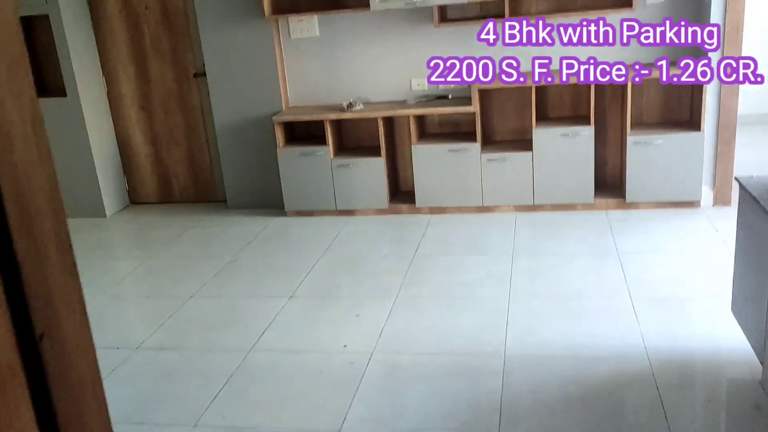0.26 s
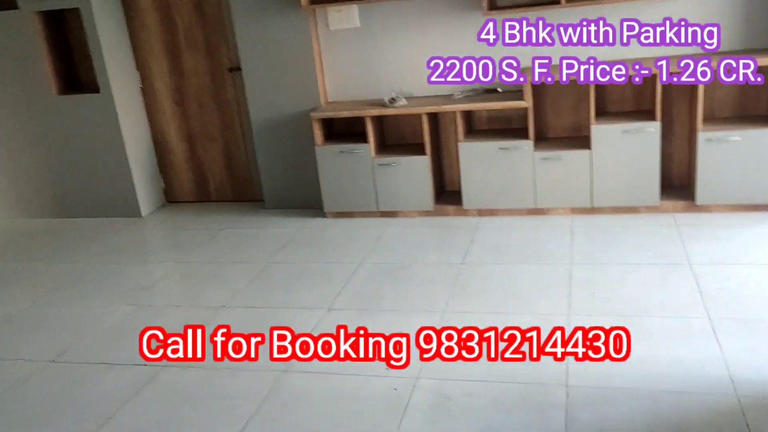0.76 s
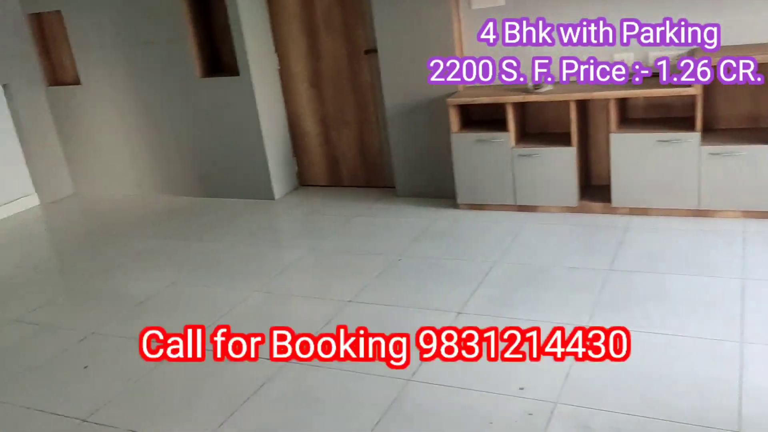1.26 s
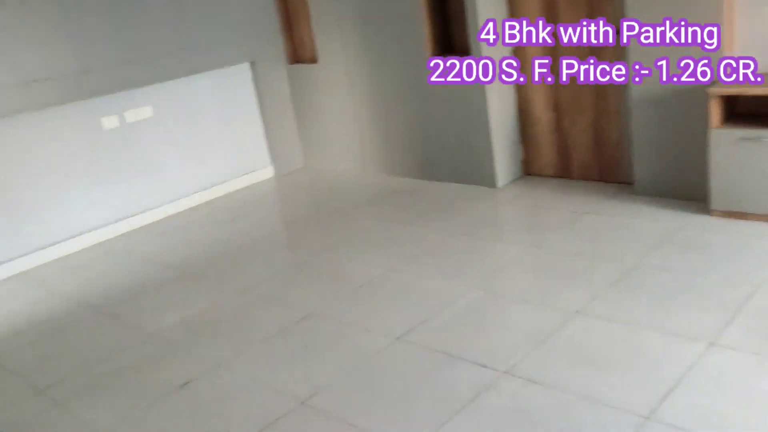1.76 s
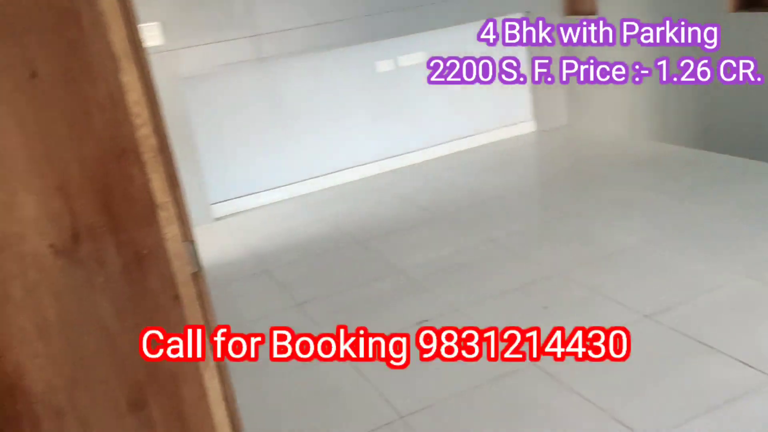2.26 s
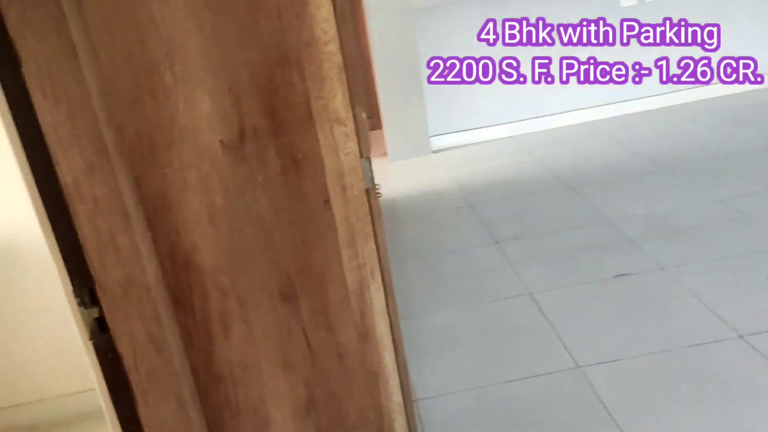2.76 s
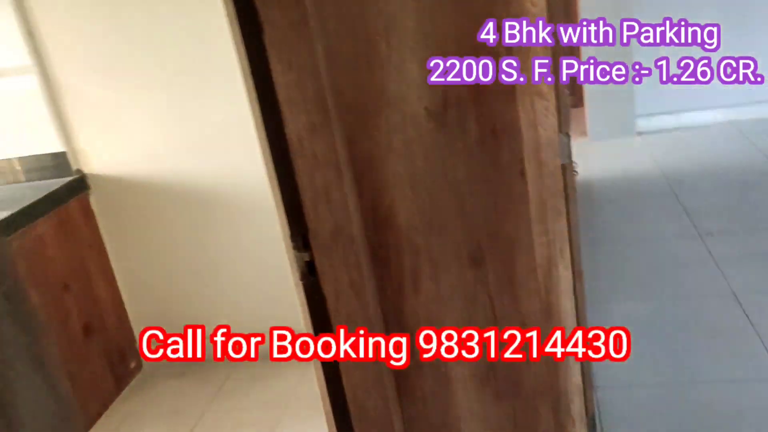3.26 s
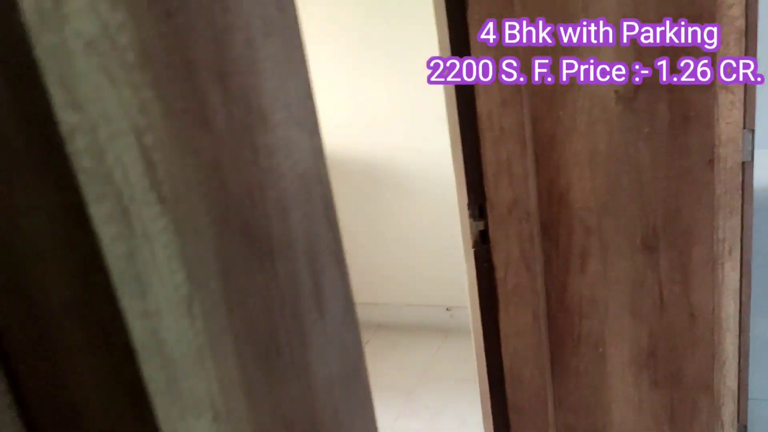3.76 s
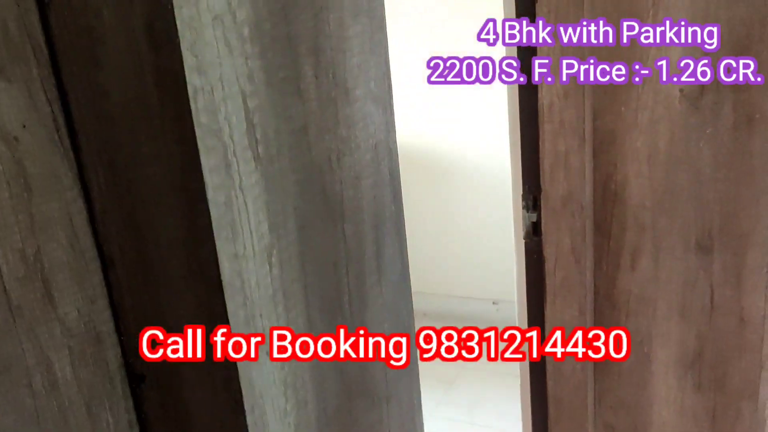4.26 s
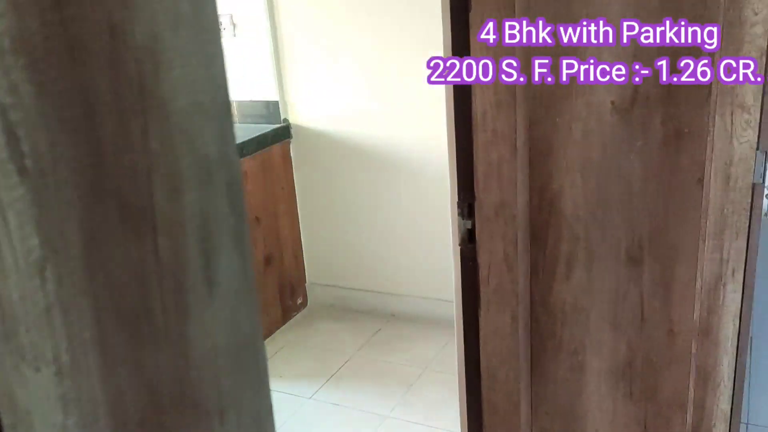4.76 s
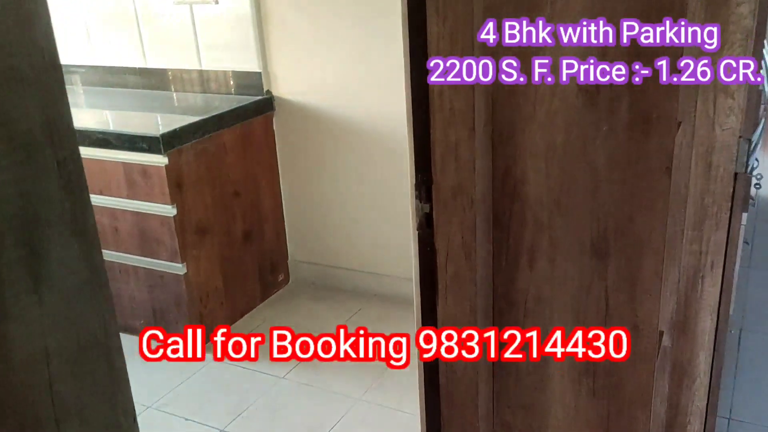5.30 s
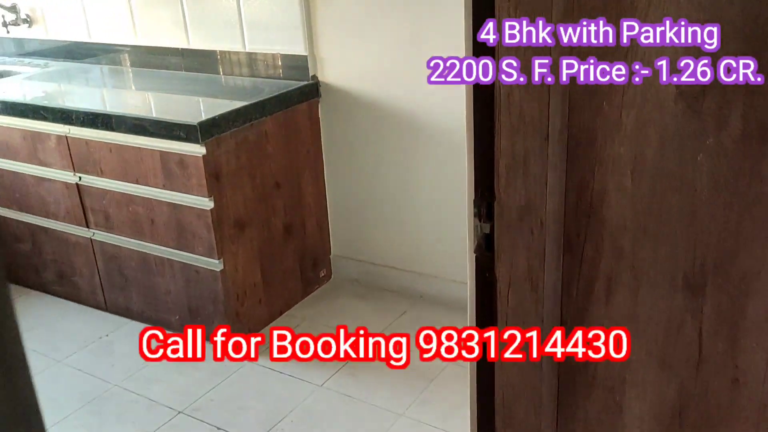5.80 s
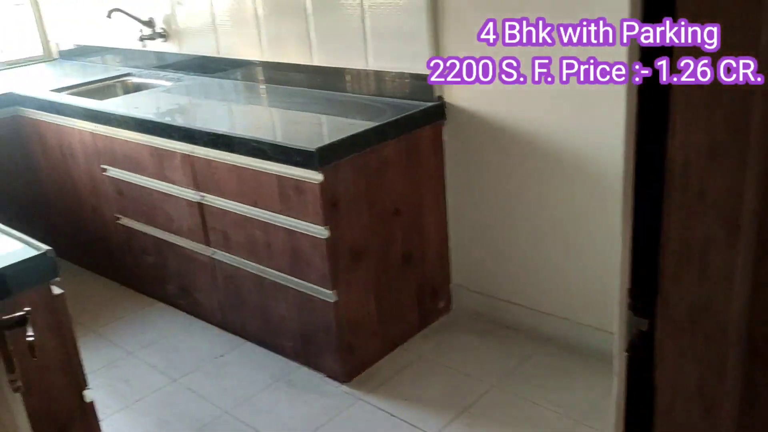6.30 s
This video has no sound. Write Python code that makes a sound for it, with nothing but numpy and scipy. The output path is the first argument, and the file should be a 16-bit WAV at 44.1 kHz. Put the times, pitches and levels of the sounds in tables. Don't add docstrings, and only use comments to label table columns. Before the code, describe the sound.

Distant traffic, low engine drones and faint horns sit under soft steps and dragging shoes on dusty tiles. After several quiet seconds a door gives a dull double thump, swings back briefly, and slams extremely loudly with a metallic snap, rattling wood and a push of low air. Bare walls ring for over a second, the leaf humming low. Stereo phone, close and distorted at the peak.

```python
import sys
import numpy as np
from scipy import signal
from scipy.fft import rfft, irfft, next_fast_len
from scipy.io import wavfile
from scipy.ndimage import uniform_filter1d

SR = 44100
rng = np.random.default_rng(int(sys.argv[2]) if len(sys.argv) > 2 else 0)


def boost(x):
    u = np.asarray(x, float) / 20
    return 10 ** u


def int16_out(signal):
    q = np.round(np.clip(np.atleast_2d(signal).T, -1, 1) * 32767)
    wavfile.write(sys.argv[1], SR, q.astype(np.int16))


N = 288502


def evened(x):
    return x / np.sqrt(np.mean(x ** 2) + 1e-20)


def read(points, hz):
    f, value = np.transpose(points)
    return np.interp(np.log(hz + 1), np.log(f + 1), value)


def follow(points, outside_db):
    s, db = np.transpose(points)
    return np.interp(np.arange(N) / SR, s, db, outside_db, outside_db)


def add(mix, s, sound):
    part = mix[..., round(s * SR):][..., :sound.shape[-1]]
    part += sound[..., :part.shape[-1]]


def colour(x, points, share=1):
    size = next_fast_len(x.shape[-1])
    gain = boost(share * read(points, np.fft.rfftfreq(size, 1 / SR)))
    return irfft(rfft(x, size) * gain, size)[..., :x.shape[-1]]


def sides(x, balance):
    return np.array([colour(x[0], balance, 0.63), colour(x[-1], balance, 0.21)])


def noise(same, field_db, length=N, size=512):
    frames, hz = 4 * length // size + 5, np.fft.rfftfreq(size, 1 / SR)
    a, b, c, d = rng.standard_normal((frames, len(hz), 4)).T
    alike = np.clip(read(same, hz), -1, 1)[:, None]
    left = a + 1j * b
    right = alike * left + np.sqrt(1 - alike ** 2) * (c + 1j * d)
    z = np.array([left, right]) * boost(field_db(hz[:, None], np.arange(frames) * size / 4 / SR))
    return signal.istft(z, nperseg=size, noverlap=3 * size // 4)[1][:, :length]


def lumps(per_s):
    width = int(SR / per_s)
    once = uniform_filter1d(rng.standard_normal(N), width, mode="wrap")
    return evened(uniform_filter1d(once, width, mode="wrap"))


def swell(start, rise, hold, db, fade_db_per_s):
    t = np.arange(N) / SR - start
    return np.clip(t / rise, 0, 1) * boost(db - fade_db_per_s * np.maximum(t - rise - hold, 0))


def ring(modes, spread_db, rise_s, size=SR):
    t = np.arange(size) / SR
    out = np.zeros(size)
    for (hz, db, t60), share_db in zip(modes, spread_db * rng.standard_normal(len(modes))):
        out += boost(db + share_db - 60 * t / t60) * np.sin(2 * np.pi * hz * t)
    return out * (1 - np.exp(-t / rise_s)) / 2


# f/Hz, likeness [-1 to 1]
ROOM_SAME = [(60, .96), (180, .95), (400, .85), (800, .55), (1600, -.3), (5000, .05), (15000, .1)]


def burst(t60, spectrum, rise_s):
    t = np.arange(4096) / SR
    fade = boost(-60 * t / t60) * (1 - np.exp(-t / rise_s))
    z = rfft(noise(ROOM_SAME, lambda hz, frame: 0 * (hz + frame), length=len(t), size=256) * fade)
    z *= boost(read(spectrum, np.fft.rfftfreq(len(t), 1 / SR))) / (np.abs(z) + 1e-12) ** 0.75
    x = irfft(z) * np.sqrt(fade)
    return x / np.abs(x).max()


# f/Hz, t60/s
ROOM_T60 = [(40, 0.17), (120, 1.03), (300, 1.315), (900, 1.56), (2000, 1.42), (4000, 1.08), (8000, 0.81),
            (14000, 0.48)]
# f/Hz, level/dB
ROOM_COLOUR = [(40, -4), (90, -6.5), (150, -8), (350, -3.5), (900, -5), (2000, -6), (3700, -9.5),
               (6000, -13), (14000, -8)]


def room(x):
    def fading_db(hz, t):
        near_walls_db = 2 * np.exp(-t / 0.21)
        return near_walls_db - 60 * t / read(ROOM_T60, hz)
    tail = noise(ROOM_SAME, fading_db, length=2 * SR, size=1024)
    tail *= np.clip(np.arange(2 * SR) / SR / 0.0017 - .3, 0, 1)
    tail /= np.linalg.norm(tail[0])
    return colour(signal.fftconvolve(x, tail, axes=1)[:, :N], ROOM_COLOUR)


# f/Hz, level/dB per Hz
TRAFFIC = [(12, -36.5), (20, 8), (49, -4), (70, -4.5), (107, -6.5), (140, -8.5), (313, -13), (348, -16),
           (410, -18.5), (700, -26), (910, -27.5), (1540, -120)]
# f/Hz, level/dB per Hz
AIR = [(180, -48.5), (300, -23.5), (404, -30.5), (526, -16.5), (768, -35.5), (937, -15.5), (1350, -18.5),
       (1590, -18), (2650, -22), (3510, -29), (11000, -23.5), (15500, -34.5)]
# f/Hz, likeness [-1 to 1]
AIR_SAME = [(60, 0.83), (180, 1), (550, 0.69), (1650, -0.034), (4970, 0.24), (15000, 0.033)]
# f/Hz, level/dB
AIR_SIDE = [(60, 4), (240, -1), (950, 7.5), (3770, 20.5), (15000, -2.5)]
# t/s, hold/s, level/dB
PASSING = [
    (0.0, .18, -57),
    (2.2, .08, -62),
]
# t/s, level/dB
HISS = [(0.0, -79.5), (1.2, -80), (2.0, -83.5), (2.6, -81.5), (3.6, -83), (4.49, -85)]
# t/s, hold/s, level/dB, fade/dB per s
SHUDDER = [
    (4.48, 0.034, -38, 85),
    (4.734, 0.084, -51, 287),
    (4.972, 0.015, -23.5, 48),
    (5.277, 0.41, -39.5, 99),
    (5.96, 0.39, -50.5, 106.5),
]


def street():
    rumble = evened(noise(AIR_SAME, lambda hz, t: read(TRAFFIC, hz) - 40 * (hz < 18) + 0 * t, size=4096))
    load = boost(-52.5 + 0.6 * lumps(0.99))
    load += sum(swell(s, 0.088, hold, db, 25) for s, hold, db in PASSING)
    load *= boost(1.3 * lumps(9))

    hiss = evened(noise(AIR_SAME, lambda hz, t: read(AIR, hz) + 0 * t))
    ducked_db = follow([(5.0, 0), (5.72, 0), (6.22, 5)], outside_db=5)
    hiss_db = follow(HISS, outside_db=-73.5) + 8.1 + uniform_filter1d(ducked_db, 1000)

    def low_hump_db(hz, t):
        return -24 * np.abs(np.log2((hz + 1) / 35)) + 0 * t
    shake = evened(noise(ROOM_SAME, low_hump_db, size=4096))
    shaking = sum(swell(s, 0.16, hold, db, fade) for s, hold, db, fade in SHUDDER)
    return sides(load * rumble + boost(hiss_db) * hiss, AIR_SIDE) + shaking * shake


def waver(hz, wobble_hz, flutter_db):
    turns = np.cumsum(hz + wobble_hz * lumps(22.7)) / SR
    return np.sqrt(2) * boost(flutter_db * lumps(23)) * np.sin(2 * np.pi * turns)


# t/s, hold/s, first f/Hz, last f/Hz, level/dB
DRONE = [
    (0.03, .15, 112, 110, -57),
    (2.4, .55, 117, 118, -58),
    (3.11, .3, 101, 103, -50),
    (3.55, .26, 103, 104, -54),
    (4.0, .16, 104.5, 106, -50),
    (2.42, 2.0, 211, 238, -62),
]


def drone():
    t = np.arange(N) / SR
    out = np.zeros(N)
    for s, hold, first_hz, last_hz, db in DRONE:
        hz = np.interp(t, [s, s + hold], [first_hz, last_hz])
        gain = swell(s, 0.048, hold, db, fade_db_per_s=85.5)
        out += gain * waver(hz, 0.0147 * first_hz, 1.2)
    return out


# f/Hz, level/dB
FIRST_HORN = [(2288, -74), (2708, -51.5), (3155, -50), (3607, -52)]
SECOND_HORN = [(2729, -75.5), (2885, -83.5)]
THIRD_HORN = [(1640, -69), (2130, -69.5)]
SQUEAL = [(3413, -78)]
# t/s, hold/s, level/dB, fade/dB per s
HONKS = [
    (0.0, .9, -72, 22),
    (3.7, .7, -78, 40),
    (.2, .3, -71, 40),
    (2.88, .7, -90, 30),
]
# t/s, hold/s, level/dB
FIRST_GLINTS = [
    [],
    [(.05, .05, -74), (.18, .04, -62), (.27, 0.042, -69), (.5, 0.092, -62), (.62, .05, -67),
     (.78, .11, -62), (1.02, 0.094, -64.5), (1.17, .05, -63), (1.28, .03, -78)],
    [(0.0, .09, -71), (.17, .02, -72), (.37, .05, -72), (.47, .03, -78), (.54, .04, -69), (.67, 0.046, -67),
     (.72, 0.049, -56.5), (.9, .06, -68), (1.145, .01, -63)],
    [(.04, .18, -76), (.44, 0.15, -74.5), (.79, .06, -71)],
]
SECOND_GLINTS = [
    [(3.46, .03, -74), (3.56, 0.072, -73), (3.74, 0.13, -64), (3.95, 0.15, -61.5), (4.16, 0.039, -69),
     (4.32, 0.11, -74)],
    [(3.84, .02, -65), (3.91, .02, -71), (3.98, .14, -71), (4.2, .12, -74)],
]
SQUEAL_GLINTS = [
    [(2.88, .04, -69), (3.0, 0.065, -68), (3.17, 0.021, -70), (3.285, .01, -82), (3.375, .02, -75),
     (3.47, .05, -83), (3.62, .06, -80)],
]


def horns():
    out = np.zeros((2, N))
    ear_gain = boost(np.array([[2.5], [-4.5]]))
    sources = zip([FIRST_HORN, SECOND_HORN, THIRD_HORN, SQUEAL], HONKS,
                  [FIRST_GLINTS, SECOND_GLINTS, [[], []], SQUEAL_GLINTS])
    for partials, (s, hold, honk_db, fade), glints in sources:
        loudest_db = max(db for hz, db in partials)
        for (hz, db), flashes in zip(partials, glints):
            ears = ear_gain * np.array([waver(hz, 5, 2.1), waver(hz, 5, 2.8)])
            gain = swell(s, 0.028, hold, honk_db + db - loudest_db, fade)
            for start, length, glint_db in flashes:
                gain += swell(start, 0.024, length, glint_db, fade_db_per_s=350)
            out += gain * ears
    return out


# t/s, rise/s, hold/s, level/dB, rubber chafe level/dB
SCUFFS = [
    (0.772, 0.007, 0.014, -53.5, -23),
    (0.897, .011, 0.084, -68, -1),
    (1.03, .011, 0.043, -58, -27),
    (1.379, 0.04, 0.026, -60.5, -5.5),
    (2.282, 0.019, 0.14, -62.5, -8),
    (2.448, 0.085, 0.43, -58.5, -16),
    (3.322, 0.022, 0.046, -64.5, -12),
    (3.805, 0.071, 0.052, -62, -3.5),
    (5.246, 0.1, 0.053, -62.5, -10),
    (5.745, .015, 0.023, -82.5, -13.5),
]
# f/Hz, level/dB per Hz
SCUFF = [(500, -26.5), (900, -2.5), (2210, -7.5), (4100, -3), (5100, -1), (6300, -3.5), (10000, -4),
         (13500, -8), (15500, -11)]
# f/Hz, level/dB
CHAFE = [(1300, -42), (1800, -2), (2300, 7.5), (2800, -8.5), (3300, -23)]


def scuffs():
    grit = evened(noise(AIR_SAME, lambda hz, t: read(SCUFF, hz) + 0 * t, size=256))
    chafe = evened(colour(grit, CHAFE))
    drag = np.zeros((2, N))
    for s, rise, hold, db, chafe_db in SCUFFS:
        drag += swell(s, rise, hold, db, fade_db_per_s=146) * (grit + boost(chafe_db) * chafe)
    return 1.44 * drag * boost(1.2 * lumps(150))


# t/s, sole level/dB, centre f/Hz, breadth/octaves, click level/dB
STEPS = [(.106, -54.5, 870, 1.8, -71), (0.186, -37.5, 1700, 0.84, -48), (.19, -43, 378, .3, -75),
         (0.1987, -39.5, 343, 0.37, -75), (.207, -36, 343, 0.2, -75), (.208, -45, 880, 0.19, -75),
         (.215, -42, 875, 0.17, -75), (.232, -44, 535, 0.65, -71), (0.445, -54, 6100, 0.4, -64),
         (.496, -47.5, 2300, 0.76, -63), (0.8723, -34, 2100, 0.81, -80), (.8818, -38, 4840, 0.59, -71),
         (0.8825, -29, 735, 0.42, -37), (.884, -39, 1900, 0.36, -61), (.8865, -37, 987, 0.053, -77),
         (.901, -40, 364, 0.25, -71), (1.029, -65, 780, 0.4, -26.5), (1.4995, -42, 860, 0.69, -66),
         (1.501, -39, 193, .5, -79), (1.516, -46.5, 260, 0.51, -79), (1.54, -47, 323, .5, -81),
         (1.562, -46, 278, 0.58, -79), (2.085, -42.5, 2700, 0.63, -72), (2.2864, -36, 560, 1.2, -65),
         (2.292, -38.5, 2500, 0.57, -66), (2.315, -42.5, 610, 0.4, -79), (2.345, -45.5, 453, 0.81, -79),
         (2.496, -34.5, 236, 0.55, -69), (2.837, -45.5, 1170, 0.76, -73), (3.2, -53, 2380, 0.32, -65),
         (3.326, -43, 320, 0.59, -68), (4.101, -50, 2400, 0.46, -60), (4.231, -74, 5900, 0.65, -54)]
NUDGES = [
    (4.806, -34.5, 696, 0.63, -73.5),
    (4.816, -24, 384, 1, -70),
    (4.826, -27, 600, 0.82, -68),
    (4.838, -41.5, 478, 0.76, -69.5),
]
# f/Hz, level/dB per Hz
GRIT = [(900, -33), (2000, -4), (3500, -2.5), (5500, 3), (8000, 3), (11000, 5.5), (13500, -13),
        (16000, -28)]
# centre f/Hz, left minus right level/dB
STEP_SIDE = [(300, -1), (800, 0.5), (2000, 9), (6000, 2)]


def steps(falls):
    out = np.zeros((2, N))
    for s, db, hz, octaves, click_db in falls:
        sole = [(hz * 2 ** (-3 * octaves), -50), (hz * 2 ** -octaves, -8), (hz, 0),
                (hz * 2 ** octaves, -9), (hz * 2 ** (3 * octaves), -40)]
        fall = boost(db) * burst(0.11, sole, rise_s=0.00025)
        fall = fall + boost(click_db) * burst(0.038, GRIT, rise_s=0.00029)
        t = np.arange(fall.shape[-1]) / SR
        fall = fall * (1 + 0.75 * boost(-60 * t / 0.0031))
        lean = boost(read(STEP_SIDE, hz) * np.array([[1], [-1]]) / 2)
        add(out, s, lean * fall)
    return out


# t/s, level/dB, f/Hz, t60/s
GUSTS = [
    (4.909, 2.5, 28.5, .15),
    (4.957, -6, 38, .08),
    (4.976, -9, 78, .2),
    (4.997, -6, 42, .2),
    (5.002, -6, 80, .17),
]


def gusts():
    out = np.zeros(N)
    for s, db, hz, t60 in GUSTS:
        add(out, s, -2 * ring([(hz, db, t60)], spread_db=0, rise_s=0.003))
    return out


# f/Hz, level/dB, t60/s
HELD = [(95.1, -7.5, 0.92), (103.6, -17, 1.3), (203, -18, 0.72), (231.6, -13, 0.66), (282, -21.5, 0.49),
        (299, -29, 0.77)]


def held():
    out = np.zeros(N)
    add(out, 4.985, -ring(HELD, spread_db=2, rise_s=0.0097))
    return out


def jamb():
    out, t = np.zeros(N), np.arange(SR // 2) / SR
    hum = np.sin(2 * np.pi * 392 * t)
    for s, crack_db, knock_db, boom_db, pump_db in BLOWS:
        add(out, s, boost(2.8 * knock_db - 0.5 - 60 * t / 0.5) * hum)
    return out


# t/s, level/dB, centre f/Hz
LATCH = [
    (4.9112, 1, 6040),
    (4.914, -15.5, 6816),
    (4.939, -18, 6800),
    (4.975, -9, 4500),
    (4.984, -17, 10300),
]


def latch():
    out = np.zeros((2, N))
    octaves = 0.12
    for s, db, hz in LATCH:
        snap = [(hz * 2 ** (-4 * octaves), -40), (hz * 2 ** -octaves, -9), (hz, 0),
                (hz * 2 ** (2 * octaves), -9), (16000, -35)]
        add(out, s, boost(db) * burst(0.0047, snap, rise_s=0.00054))
    return out


# t/s, latch crack, panel knock, leaf boom, air pump level/dB
BUMPS = [
    (4.494, -22, -28.5, -38.5, -29.5),
    (4.497, -31, -22, -39.5, -39),
    (4.5005, -31.5, -29.5, -43, -35),
    (4.509, -41.5, -19, -16.5, -24.5),
    (4.516, -26.5, -25.5, -25, -47),
    (4.5215, -50, -20, -18.5, -30.5),
    (4.534, -35.5, -45, -20, -46.5),
    (4.812, -61, -57, -32, -35.5),
]
BLOWS = [
    (4.910, -5, -4.5, -5, -9),
    (4.920, -20, -7.5, -20, -20.5),
    (4.940, -18.5, -18.5, -16, -28),
    (4.9622, -30, -15, -0.5, -21),
    (4.979, -21.5, -6, -28.5, -34),
    (4.987, -18.5, -9.5, -1, -42.5),
    (4.993, -28.5, -12.5, -29, -45),
    (5.071, -42, -15.5, -30, -43.5),
    (5.131, -55, -26.5, -26.5, -44),
]
# f/Hz, level/dB, t60/s
BUMP_PANEL = [(176, 2.5, 0.13), (204.6, -5, 0.069), (244.9, 5, 0.25), (320, -9.5, 0.034), (514, 5, 0.093),
              (675, -10, 0.036), (880, -12.5, 0.04), (1120, -10.5, 0.037), (1675, 0.5, 0.036),
              (2100, -4, 0.03)]
# f/Hz, level/dB, t60/s
PANEL = [(165, -10.5, 0.025), (225, 5, 0.14), (305.4, -6, 0.18), (468, -12.5, 0.34), (562, -1.5, 0.053),
         (708, -3, 0.086), (869, -11, 0.14), (977, -7, 0.2), (1355, -11, 0.081), (1755, -15.5, 0.05),
         (2230, -15, .04)]
# f/Hz, level/dB per Hz
BUMP_KNOCK = [(82, -23), (140, -3), (220, 4), (330, -9.5), (420, -7.5), (600, -14.5), (900, -10.5),
              (1300, -15.5), (2130, -26), (4000, -32), (5200, -58), (8800, -120)]
KNOCK = [(82, -33), (140, -1.5), (242, 3.5), (320, 1.5), (395, 1.5), (600, -4.5), (867, -5.5), (1460, -19),
         (2130, -25), (4000, -35.5), (5200, -64), (8800, -120)]
# f/Hz, level/dB
CRACK = [(900, -26.5), (1800, 0), (2700, 3), (3600, -7), (5500, 0), (7800, -3.5), (11000, -1), (13500, -15),
         (16000, -24.5)]
# f/Hz, level/dB, t60/s
BOOM = [(82.8, 5.5, 0.28), (97.6, -14, 1), (103.5, -12, 0.44), (122, -4.5, 0.21)]
# f/Hz, level/dB, t60/s
PUMP = [(26.8, 2, 0.12), (47.7, -2.5, 0.78), (58.4, -4.5, 0.44)]


def door(blows, panel, knock):
    out = np.zeros((2, N))
    for s, crack_db, knock_db, boom_db, pump_db in blows:
        add(out, s, boost(crack_db + 8) * burst(0.034, CRACK, rise_s=0.0005))
        add(out, s, boost(knock_db) * 0.65 * ring(panel, spread_db=3.0, rise_s=0.0012, size=8192))
        add(out, s, boost(knock_db) * 2.63 * burst(0.079, knock, rise_s=0.0011))
        add(out, s, -boost(boom_db) * ring(BOOM, spread_db=1.5, rise_s=0.0035))
        add(out, s, -boost(pump_db) * ring(PUMP, spread_db=7.5, rise_s=0.008, size=SR // 2))
    return out


# f/Hz, level/dB
DOOR_SIDE = [(60, 8.5), (180, -3.5), (550, -1), (1650, 11.5), (4970, 9), (9000, -1.5)]


def scene():
    bump = door(BUMPS, BUMP_PANEL, BUMP_KNOCK)
    slam = door(BLOWS, PANEL, KNOCK)
    wood = sides(bump + slam + latch(), DOOR_SIDE)
    near = wood + steps(STEPS) + steps(NUDGES) + scuffs()
    outside = street() + drone() + horns()
    return outside + near + room(near) + jamb() + held() + gusts()


def top_cut(x):
    return signal.sosfilt(signal.butter(12, 15600, fs=SR, output="sos"), x)


def record(dry):
    knee = 6.9
    flattened = dry / (1 + np.abs(dry) ** knee) ** (1 / knee)
    return top_cut(flattened)


dry = scene()
out = record(dry)
int16_out(out)
```